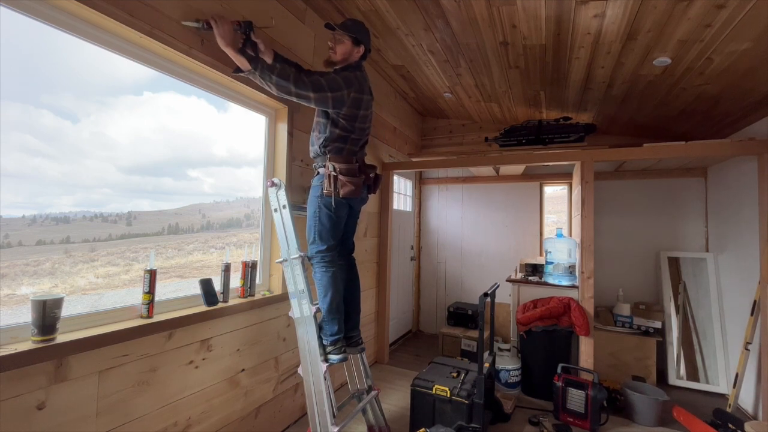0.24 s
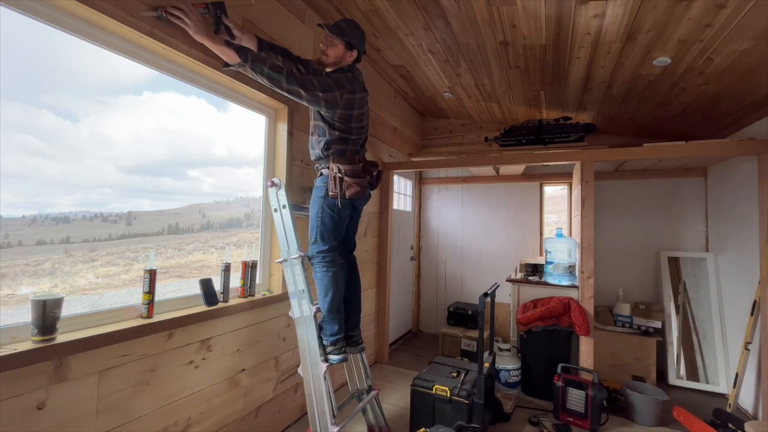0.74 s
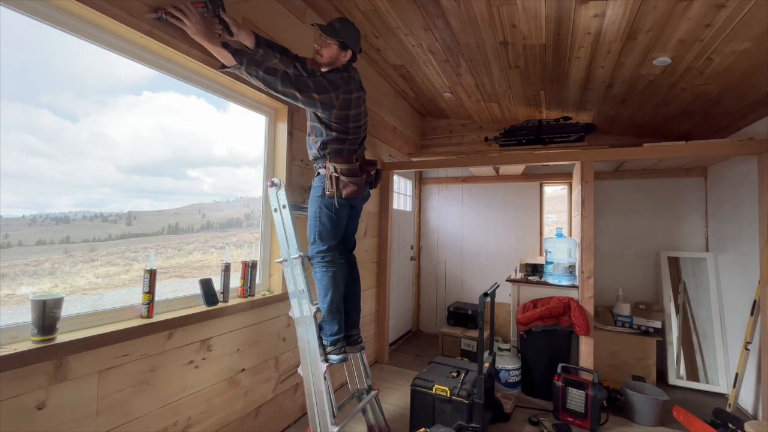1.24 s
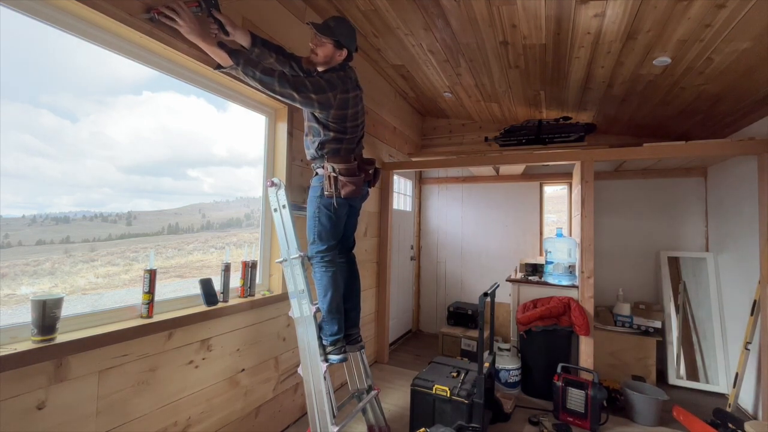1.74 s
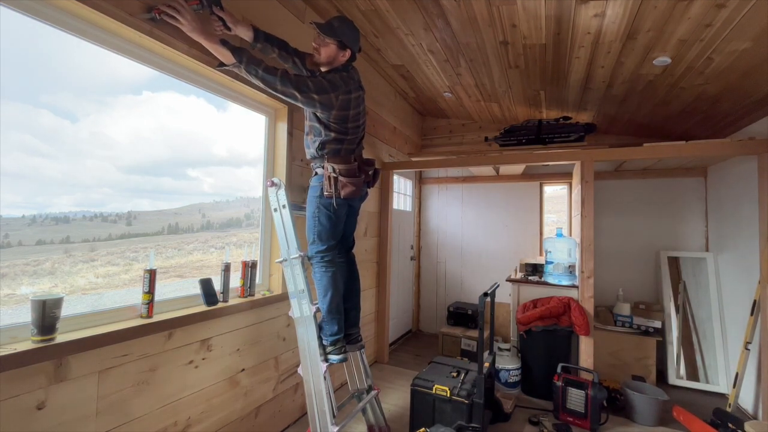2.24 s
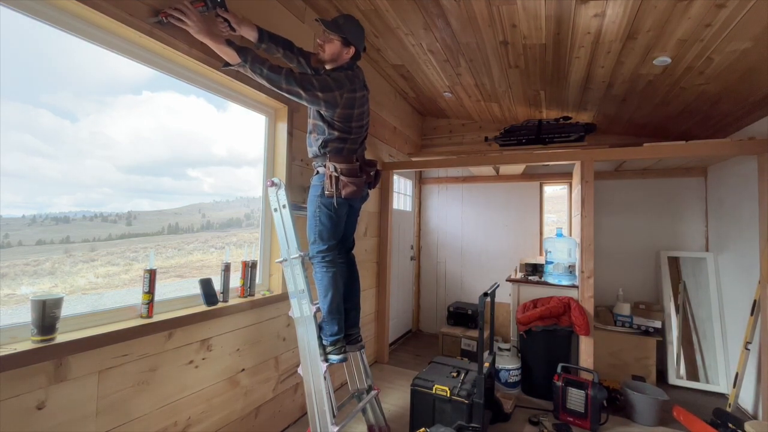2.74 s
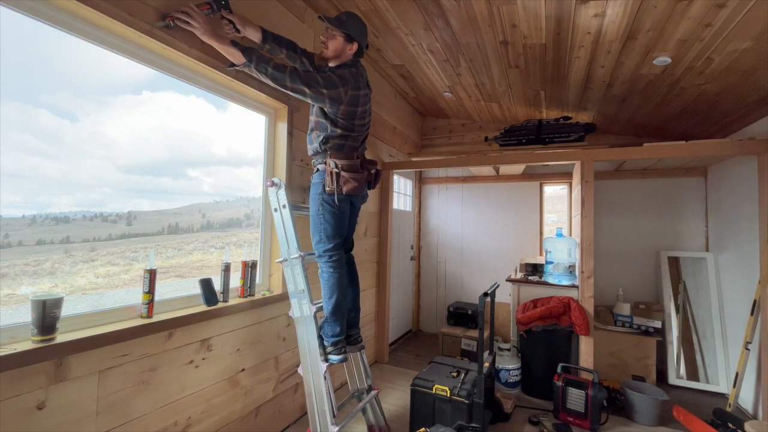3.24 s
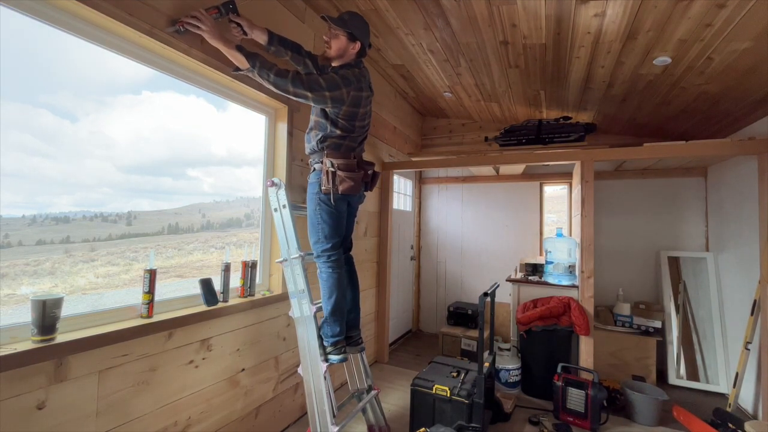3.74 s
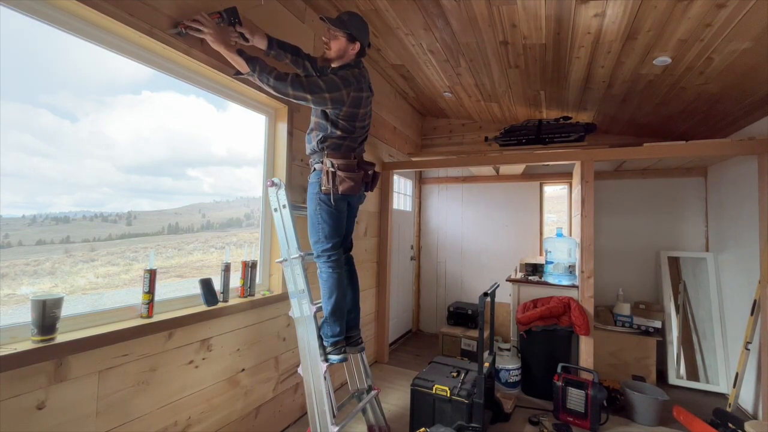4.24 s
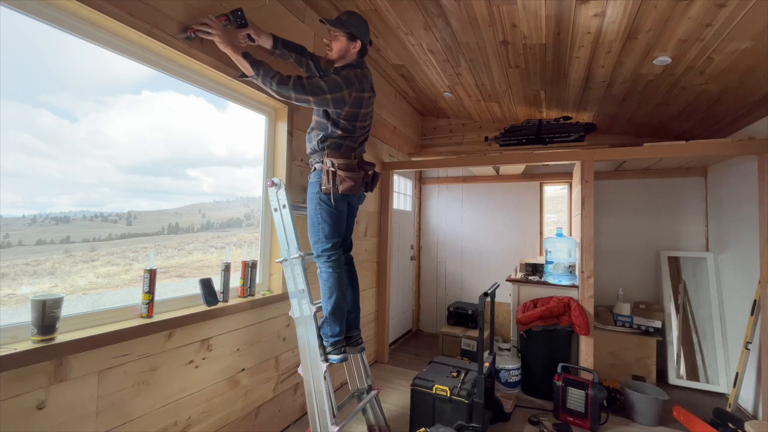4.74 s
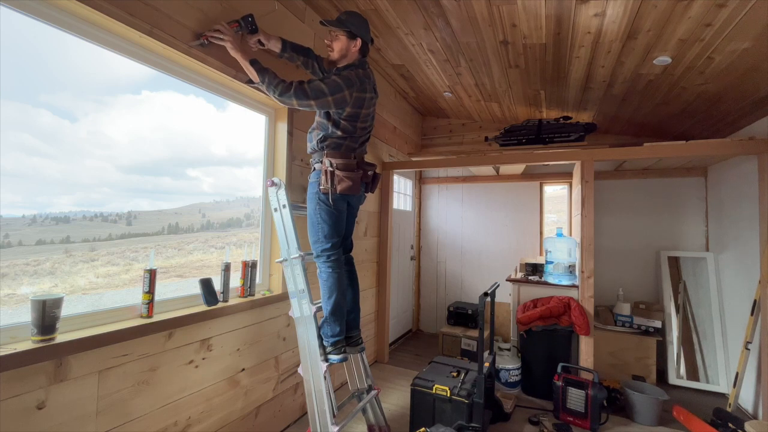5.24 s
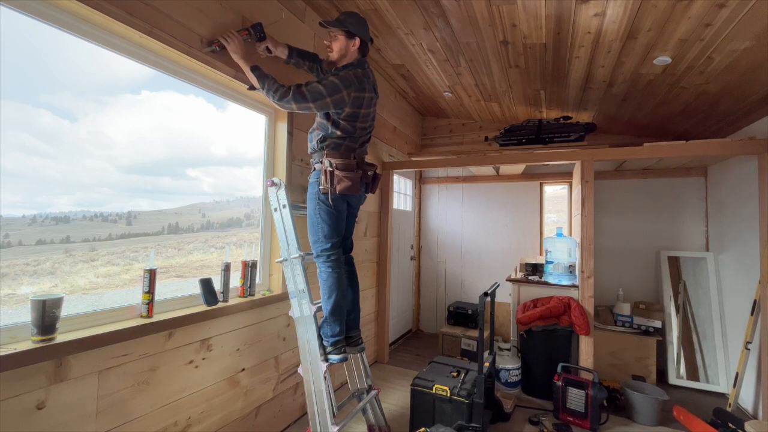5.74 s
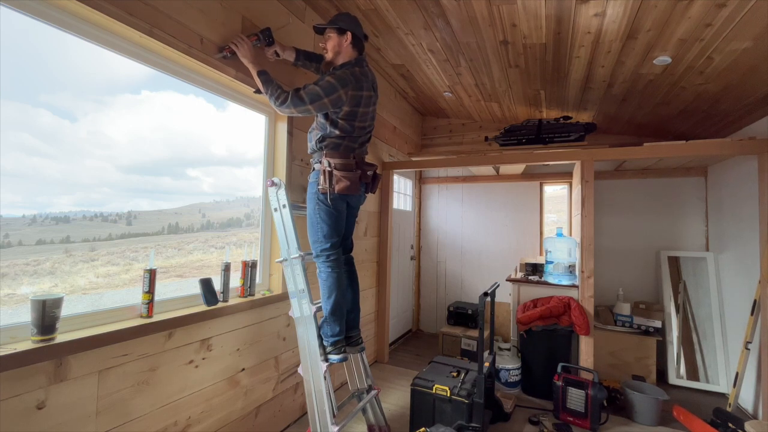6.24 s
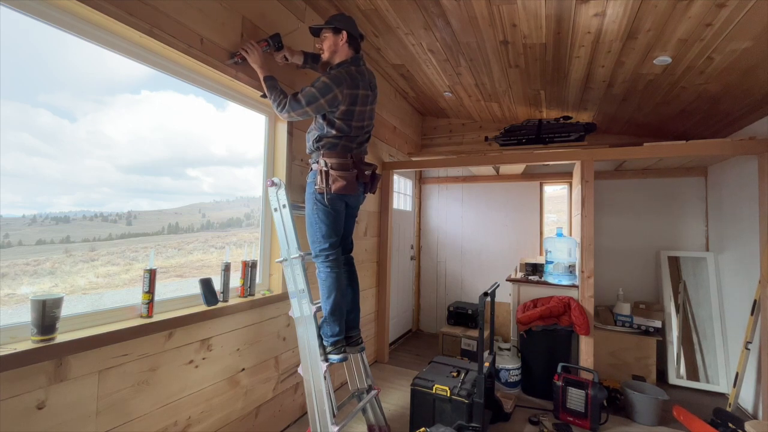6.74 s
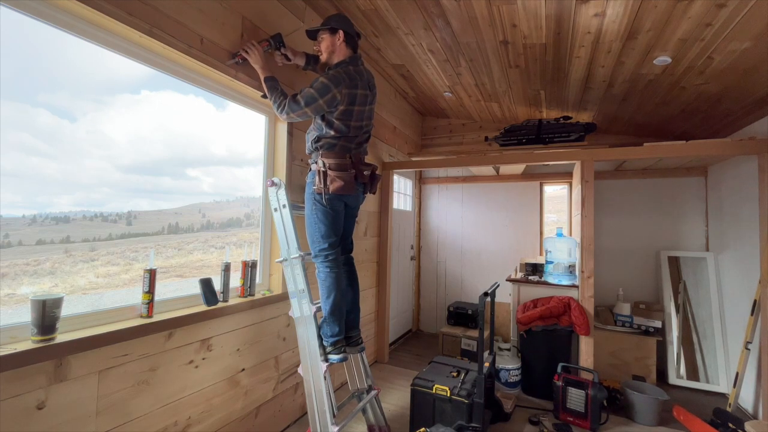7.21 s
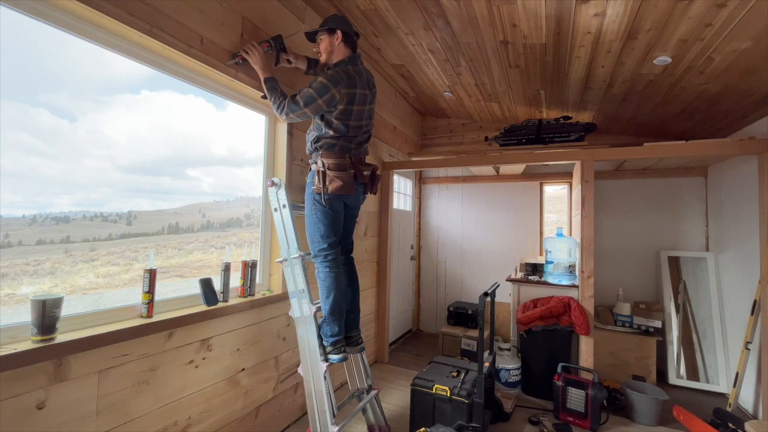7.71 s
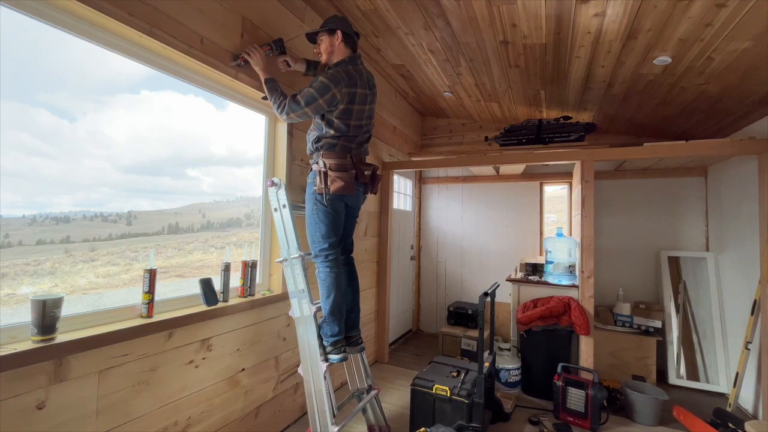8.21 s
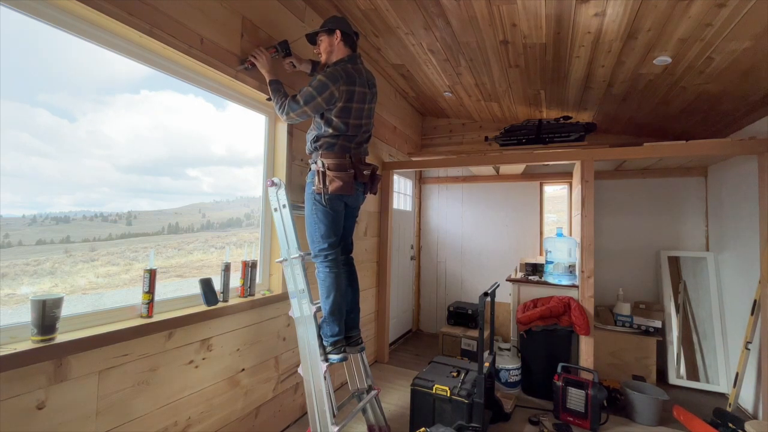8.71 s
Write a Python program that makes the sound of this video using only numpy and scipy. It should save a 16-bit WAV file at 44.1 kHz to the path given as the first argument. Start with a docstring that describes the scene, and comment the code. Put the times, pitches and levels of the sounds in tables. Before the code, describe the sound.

A caulking gun's metal trigger clicks and snaps in scattered singles and clusters inside a small bare wooden cabin, with dull wall knocks and faint hand rubbing.

```python
"""A caulking gun is worked high on the wall of a small wooden cabin, a few metres from a stereo microphone.
Its steel trigger parts click and snap: metal chatter that rings the cartridge tube and the steel frame.
A steel rod slides in its catch as gritty noise, wall boards knock dully as pushed resonances,
and hands and sleeves rub along the wood as dense noise grains. A few small dry ticks sit close by.
The bare cabin answers with a noise tail of about half a second over a quiet, slowly swelling floor."""
import sys
import numpy as np
from scipy import signal
from scipy.fft import rfft, irfft, next_fast_len
from scipy.io import wavfile
from scipy.ndimage import uniform_filter1d

SR = 44100
rng = np.random.default_rng(int(sys.argv[2]) if len(sys.argv) > 2 else 0)


def natural_amplitude(level_db):
    """Convert a level in decibels to a linear amplitude factor, elementwise."""
    exponent = np.asarray(level_db, float) / 20
    return 10 ** exponent


def wav_out(sig):
    """Save sig, one row per channel (or a flat mono array), as 16-bit PCM at SR to the path in sys.argv[1]."""
    wavfile.write(sys.argv[1], SR, np.round(np.clip(np.atleast_2d(sig).T, -1, 1) * 32767).astype(np.int16))


N = 395577  # length [samples]


def at(table, hz):
    """Value of a (frequency, value) table on a log-frequency axis."""
    points = np.array(table)
    return np.interp(np.log(np.maximum(hz, 1)), np.log(points[:, 0]), points[:, 1])


def colour(x, table, lag_ms=0):
    """Filter by (frequency [Hz], gain [dB]) points, with an optional delay."""
    size = next_fast_len(x.shape[-1] + 512)
    hz = np.arange(size // 2 + 1) * SR / size
    delay = np.exp(-2j * np.pi * hz * lag_ms / 1000)
    return irfft(rfft(x, size) * natural_amplitude(at(table, hz)) * delay, size)[..., :x.shape[-1]]


def unit(x):
    """Scale to rms 1."""
    return x / np.sqrt(np.mean(x ** 2))


def peak(x, db):
    """Scale to a peak level."""
    return x * natural_amplitude(db) / np.abs(x).max()


def add(track, s, x):
    """Mix a sound in from time s."""
    i = max(int(s * SR), 0)
    track[i:i + len(x)] += x[:len(track) - i]


def walk(rate):
    """Random levels held for 1 / rate seconds and slewed twice, at rms 1."""
    hold = int(SR / rate)
    steps = np.repeat(rng.standard_normal(N // hold + 1), hold)
    slewed = uniform_filter1d(uniform_filter1d(steps, hold), hold)
    return unit(slewed[:N])


def ring(modes, near_hz, octaves, count):
    """Decaying sines from (frequency [Hz], level [dB], t60 [s]) modes; the struck spot favours one pitch."""
    hz, db, t60 = np.transpose(modes)[:, :, None]
    t = np.arange(count) / SR
    db = db - np.minimum(10 * (np.log2(hz / near_hz) / octaves) ** 2, 12)
    decay = np.exp(-np.log(1000) * t / t60)
    return (natural_amplitude(db) * np.sin(2 * np.pi * hz * t) * decay).sum(0)


def metal_chatter():
    """Random contacts build up over a few ms and die out; hard metal excites all pitches about evenly."""
    ms = np.arange(600) / SR * 1000
    contacts = rng.standard_normal(600) * ms * np.exp(-(ms / 4.3) ** 1.3)
    tones = rfft(contacts)
    evened = irfft(tones / np.abs(tones) ** 0.96, len(ms))  # 1 would make the spectrum flat
    evened = evened * np.clip(ms / 1.5, 0, 1) * np.exp(-(ms / 9) ** 3)
    return np.pad(evened, (0, 1400))


def gun():
    """Each click is a few ms of metal chatter: a broad clack that also rings the cartridge tube and steel frame."""
    # trigger clicks: (time [s], tube level [dB], steel level [dB], crack level [dB],
    # ring that stands out [Hz]); the tube and steel levels are trimmed below
    clicks = [(0.254, -35, -71, -61, 1190), (0.583, -49, -56, -57.5, 1600),
              (0.682, -57, -53.5, -60.5, 1730), (0.904, -38, -38, -61, 1470),
              (1.251, -34.5, -52, -69, 1050), (2.219, -55, -80, -65, 1210),
              (2.247, -44.5, -57.5, -59, 1200), (3.757, -42.5, -57.5, -55, 1401),
              (3.831, -44.5, -53, -68.5, 905), (3.883, -43, -47, -58.5, 1880),
              (3.917, -22.5, -19, -14.5, 1565), (4.244, -51.5, -64.5, -85, 1670),
              (4.48, -55, -46.5, -53, 1444), (4.501, -51, -60, -64, 1530), (4.529, -54, -26, -20, 4530),
              (6.542, -64, -58, -67.5, 1292), (6.792, -56, -60, -60, 1590), (6.821, -37.5, -35, -71, 3350),
              (6.938, -22, -31.5, -30.5, 1720), (6.944, -29, -35, -37, 1520), (7.165, -32, -51, -60, 1360),
              (7.18, -38, -37.5, -43, 1620), (7.505, -52, -71, -55.5, 1630),
              (7.536, -28.5, -35, -32.5, 1940), (7.798, -36.5, -39.5, -47, 1400),
              (8.826, -40, -40, -44, 3040), (8.921, -45, -43, -58, 1650), (8.944, -21.5, -28, -66, 1660)]
    # modes of the steel frame: (frequency [Hz], relative level [dB], t60 [s])
    steel_modes = [(2830, -2, 0.05), (3150, 3.5, 0.022), (3760, -6.5, 0.025), (4295, -1.5, 0.023),
                   (4905, -10, 0.05), (5220, -11.5, 0.032), (5640, 4.5, .03), (6274, -1, 0.017),
                   (8080, 8.5, 0.02), (9700, 1, 0.035), (10700, -14, 0.01)]
    usual_tube_hz, usual_frame_hz = 2040, 4126
    steel_from_hz = 2500  # rings from here up belong to the steel
    tube_t60 = 0.01393  # s
    crack_band = signal.butter(2, [5300, 15000], "band", fs=SR, output="sos")
    wide_band = signal.butter(1, [900, 7500], "band", fs=SR, output="sos")
    out = np.zeros(N)
    for s, tube_db, steel_db, crack_db, hz in clicks:
        if hz < steel_from_hz:
            tube_hz, steel_hz = hz, usual_frame_hz
        else:
            tube_hz, steel_hz = usual_tube_hz, hz
        chatter = metal_chatter()
        tube_modes = [(tube_hz, 0, tube_t60), (1.2 * tube_hz, -8, tube_t60)]
        tube = ring(tube_modes, tube_hz, 2.4, count=1400)
        steel = ring(steel_modes, steel_hz, 0.42, count=1400)
        click = peak(signal.fftconvolve(chatter, tube)[:2000], tube_db - 3.5)
        click += peak(signal.fftconvolve(chatter, steel)[:2000], steel_db - 4.5)
        # the clack: chatter in a band around each ring
        tube_band = signal.butter(2, [0.84 * tube_hz, 1.895 * tube_hz], "band", fs=SR, output="sos")
        steel_band = signal.butter(2, [0.7 * steel_hz, 1.727 * steel_hz], "band", fs=SR, output="sos")
        click += peak(signal.sosfilt(tube_band, chatter), tube_db - 6)
        click += peak(signal.sosfilt(steel_band, chatter), steel_db - 1)
        # a thin share of the clack, filtered backwards, fills the gaps between the rings
        filler = signal.sosfilt(wide_band, chatter[::-1])[::-1]
        click += peak(filler, (tube_db + steel_db + crack_db) / 3 + 0.5)
        click += peak(signal.sosfilt(crack_band, chatter), crack_db)
        add(out, s - .002, click)
    return out


def rub(outlines, spectrum, grain_db, flutter_db):
    """Friction: dense uneven noise grains along (time [s], level [dB], brightness [dB]) outlines."""
    t = np.arange(N) / SR
    grains = rng.standard_normal(N) * natural_amplitude(grain_db * rng.exponential(size=N))
    grains = colour(grains * natural_amplitude(flutter_db * walk(30)), spectrum)
    dull = unit(colour(grains, [(2500, -2.5), (4500, -19.0)]))
    bright = unit(colour(grains, [(2500, -12), (4000, 1.5)]))
    out = 0
    for outline in outlines:
        s, db, bright_db = np.transpose(outline)
        level = uniform_filter1d(natural_amplitude(np.interp(t, s, db, -120, -120)), size=400)
        out = out + level * (dull + natural_amplitude(np.interp(t, s, bright_db)) * bright)
    return out


def slides():
    """The steel rod slides in its catch, harder and harder, until it lets go and the friction stops dead."""
    # slides of the rod: (end [s], length [s], level at the end [dB], bright over dull part [dB])
    rod_slides = [(3.79, .035, -54.5, -13), (3.87, 0.034, -66, -17), (3.923, 0.048, -50, 1),
                  (4.522, 0.055, -70, -2.5), (6.933, .035, -45.5, -9), (7.167, 0.043, -53.5, -7.5),
                  (7.533, 0.04, -58.5, 0.5), (7.801, 0.038, -43, -14.5), (8.945, 0.044, -44, -6)]
    # spectrum of the sliding steel: (frequency [Hz], relative density [dB per Hz])
    slide_colour = [(300, -15), (900, -7.5), (1500, -3), (2300, -6.5), (3200, -3.5), (5000, -10),
                    (9500, -17), (15500, -26.5)]
    build_db = 14  # gained over the length
    outlines = [[(s - length, db - build_db, bright_db), (s, db, bright_db)]
                for s, length, db, bright_db in rod_slides]
    return rub(outlines, slide_colour, grain_db=2.6, flutter_db=4.4)


def boards():
    """A soft raised-cosine push sets the modes of the wall boards ringing."""
    # knocks on the wall: (time [s], peak level [dB], loudest ring [Hz], push length [ms])
    knocks = [(0.254, -57, 190, 3.7), (0.89, -43.5, 188, 2.8), (1.254, -15, 198, 1.25),
              (1.622, -39.5, 180, 3.9), (3.932, -29, 374, 4.23), (4.111, -39.5, 178, 3.7),
              (6.819, -44.5, 447, 2.2), (6.947, -27, 200, 1.3), (7.182, -34, 438, 2.3),
              (7.518, -36.5, 156, 2.1), (7.541, -28, 430, 1.1), (7.549, -29, 185, 3.3),
              (7.786, -36.5, 431, 2.3), (8.842, -46.5, 450, 1.5), (8.946, -31, 450, 0.81)]
    # modes of the wall boards: (frequency [Hz], relative level [dB], t60 [s])
    board_modes = [(42, -13, .3), (73, -11, .2), (130, -12.5, 0.033), (172, 1, .1), (200, -0.5, 0.043),
                   (280.5, -9.5, 0.034), (338, -5, 0.1), (357.3, -3, 0.13), (450, 0.5, 0.1),
                   (555, -4.5, 0.063), (655, -1, .04), (860, 1.5, .03), (1020, -3, 0.02)]
    ms = np.arange(1000) / SR * 1000
    out = np.zeros(N)
    for s, db, hz, push_ms in knocks:
        push = np.sin(np.pi * np.clip(ms / max(push_ms, .5), 0, 1)) ** 2
        knock = signal.fftconvolve(push, ring(board_modes, hz, 0.27, count=12000))
        add(out, s, peak(knock, db))
    return out


def strokes():
    """Hands and sleeves rub the wood: each stroke swells to its firmest moment and fades."""
    # strokes: (firmest moment [s], swell [s], fade [s], level then [dB], bright over dull part [dB])
    hand_strokes = [(0.0, 0.0086, .09, -61, -3), (.258, 0.043, .2, -62.5, 1.5),
                    (.518, 0.0074, .01, -72, -13), (.88, 0.51, .03, -60, -6.5), (.904, 0.039, .1, -57, -2),
                    (1.018, 0.069, .012, -74.5, -23), (1.404, 0.013, .25, -53, -18),
                    (1.526, 0.22, .33, -62, -9), (1.798, 0.096, .08, -90, -24),
                    (2.092, 0.095, .075, -58, -8.5), (2.17, 0.013, .027, -66, -36),
                    (2.306, 0.14, .13, -60, -7.5), (3.105, .02, 0.21, -70, -14.5),
                    (3.14, 0.016, 0.12, -81, 5.5), (3.228, 0.043, .25, -64.5, -26.5),
                    (5.286, 0.069, .08, -76.5, -6.5), (5.509, 0.011, 0.071, -80, 7),
                    (5.64, .01, .06, -63.5, -17), (6.55, .1, .2, -79, 0.5),
                    (6.69, 0.014, 0.049, -68.5, 0.5), (6.81, 0.015, .01, -61, -10)]
    # spectrum of the rubbing: (frequency [Hz], relative density [dB per Hz])
    rub_colour = [(59, -41), (100, -4.5), (177, -4), (519, -6), (627, 0), (791, -5), (1230, -7),
                  (3180, -19), (9340, -31), (12300, -32.5), (15500, -46)]
    range_db = 20  # gained over the swell, lost over the fade; outlines run on for twice as long
    outlines = []
    for s, swell, fade, db, bright_db in hand_strokes:
        faint_db = db - 2 * range_db
        outlines.append([(s - 2 * swell, faint_db, bright_db), (s, db, bright_db),
                         (s + 2 * fade, faint_db, bright_db)])
    return rub(outlines, rub_colour, grain_db=3.0, flutter_db=1.87)


def ticks():
    """Small dry ticks, mostly nearer the left: a few cycles falling in pitch, later at the right port."""
    # ticks: (time [s], mean level of the two ports [dB], starting pitch [Hz], left minus right [dB])
    small_ticks = [(0.05, -53.5, 1170, 21), (0.515, -46, 1100, 15), (0.735, -45.5, 1480, 2),
                   (0.995, -40.5, 1050, 8), (1.014, -45, 1140, 12), (1.017, -57, 920, -19),
                   (2.173, -47, 1030, 14), (5.64, -48.5, 1340, -1)]
    lag_ms = 0.7
    t = np.arange(400) / SR
    out = np.zeros((2, N))
    for s, db, hz, pan_db in small_ticks:
        envelope = t * np.exp(-(t * hz / 1.17) ** 1.06)
        tick = np.sin(2 * np.pi * hz * t * (1 - 25 * t)) * envelope
        add(out[0], s - .001, peak(tick, db + pan_db / 2))
        add(out[1], s - .001 + lag_ms / 1000, peak(tick, db - pan_db / 2))
    return out


def diffuse(pair):
    """Two unrelated sounds become mid and side of a pair of ports: alike in the bass, apart higher up."""
    # width of diffuse sound: (frequency [Hz], side minus mid [dB])
    side_width = [(60, -9), (110, -4.5), (200, -5), (380, -4), (700, 5), (1290, 0.5), (2380, 0.5),
                  (4400, -0.5), (8120, 1), (15000, 1.5)]
    side = colour(pair[1], side_width)
    return np.array([pair[0] + side, pair[0] - side])


def cabin(x):
    """Diffuse tail: bands of noise, each fading at its own rate; the bass takes longer to build."""
    # reverberation of the cabin: (band centre [Hz], t60 [s], relative level [dB])
    reverb_bands = [(50, 0.69, -5.5), (150, 0.27, -6), (221, 0.28, -8), (435, 0.3, -4.5), (720, 0.23, -15),
                    (1278, .38, -7), (2072, 0.46, -4), (4150, 0.41, -2.5), (8700, 0.31, -5),
                    (14360, .15, -8)]
    t = np.arange(int(.8 * SR)) / SR
    tail = 0
    for hz, t60, db in reverb_bands:
        band_shape = [(hz / 2, -40), (hz / 1.605, -3), (hz, 0), (hz * 1.3, -3), (hz * 2, -40)]
        band = colour(rng.standard_normal((2, len(t))), band_shape)
        rise = np.clip(t / (0.006 + 1.2 / hz), 0, 1) ** 2  # 6 ms plus 1.2 cycles
        decay = np.exp(-np.log(1000) * t / t60)
        gain = natural_amplitude(db) * np.sqrt(np.log(1000) / t60 / SR)  # evens out the energy of long and short bands
        tail = tail + gain * band * rise * decay
    return diffuse(signal.fftconvolve(x[None], tail, axes=1)[:, :N])


def floor():
    """Quiet air and microphone hiss as coloured noise; the bass swells with the wind outside."""
    # spectrum of the floor: (frequency [Hz], relative density [dB per Hz])
    floor_colour = [(13, -38), (22, -3), (59, 0.5), (146, -2.5), (187, -10), (275, -2.5), (306, -7),
                    (643, -13.5), (698, -17.5), (779, -20), (1390, -8), (3070, -22.5), (3520, -30.5),
                    (4580, -28), (6500, -36.5), (8730, -30.5), (10500, -40.5), (15500, -55)]
    # slow swell of the background: (time [s], gain [dB])
    slow_swell = [(0, 4), (1.5, 0), (3.6, 2.26), (8.97, 3.5)]
    air = colour(rng.standard_normal((2, N)), floor_colour)
    air = air / np.sqrt(np.mean(air[0] ** 2)) * natural_amplitude(-67)  # rms before gusts and swell
    gusts = colour(air, [(60, -5.0), (250, -43)]) * (natural_amplitude(5.9 * walk(18)) - 1)
    swell = natural_amplitude(np.interp(np.arange(N) / SR, *np.transpose(slow_swell)))
    return swell * diffuse(air + gusts)


def scene():
    """The work is off to one side: its direct sound reaches the ports shaded and a little apart in time."""
    # direct sound at each port; far off, the bass comes mostly from the walls: (frequency [Hz], gain [dB])
    left_port = [(60, -16.5), (150, -13), (400, -4), (750, -5.5), (1400, 8.5), (2500, 1), (4500, 9.5),
                 (9000, -8), (13000, 3.5), (16000, -7.5)]
    right_port = [(60, -15.5), (150, -5.5), (400, -7), (750, -7), (1400, 3), (2500, 11.5), (4500, -17),
                  (9000, 11), (13000, 3.5), (16000, -8.5)]
    work = gun() + slides() + boards() + strokes()
    direct = np.array([colour(work, left_port), colour(work, right_port, lag_ms=0.2054)])
    return direct + natural_amplitude(10.5) * cabin(work) + ticks() + floor()


def band_limit(x):
    """A steep low-pass at the top of the band."""
    return signal.sosfilt(signal.butter(12, 16800, fs=SR, output="sos"), x)


def record(dry):
    """The deepest bass is cut; the channel sum is nearly empty near 12.5 kHz while the difference is not."""
    # colour of the sum of the channels, nearly empty near 12.5 kHz: (frequency [Hz], gain [dB])
    sum_colour = [(11200, -0.5), (12000, -1.5), (12250, -29), (13100, -28.5), (13500, 4), (15600, -0.5),
                  (16200, -15.5)]
    subsonic_cut = signal.butter(4, 33.8, "high", fs=SR, output="sos")
    heard = signal.sosfilt(subsonic_cut, dry)
    mid = colour((heard[0] + heard[1]) / 2, sum_colour)
    side = (heard[0] - heard[1]) / 2
    return band_limit(np.array([mid + side, mid - side]))


dry = scene()
out = record(dry)
wav_out(out)
```